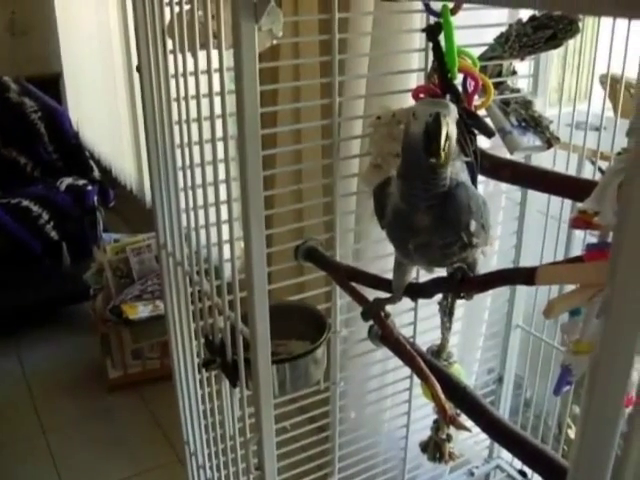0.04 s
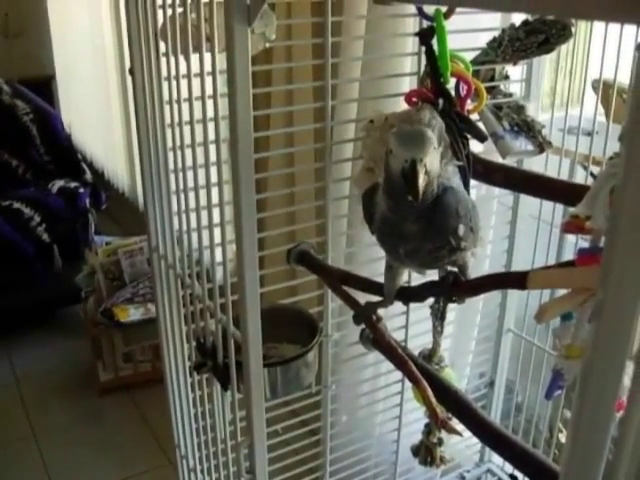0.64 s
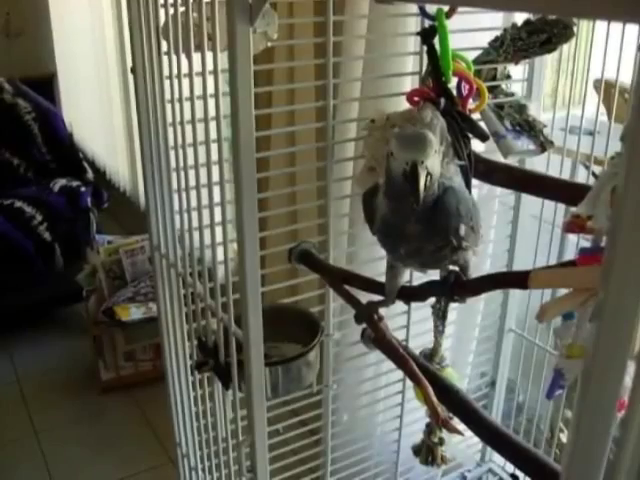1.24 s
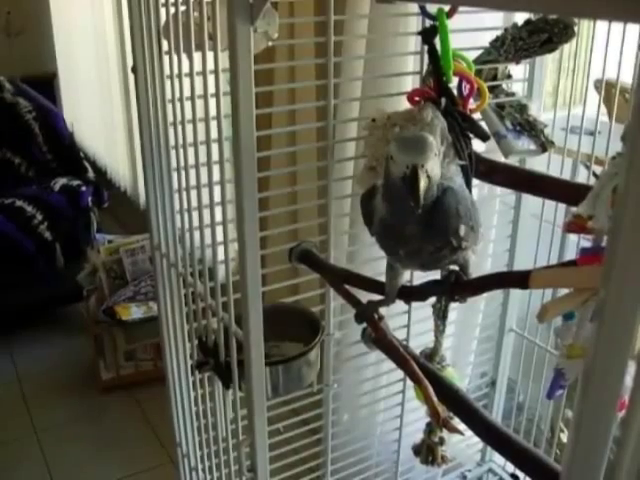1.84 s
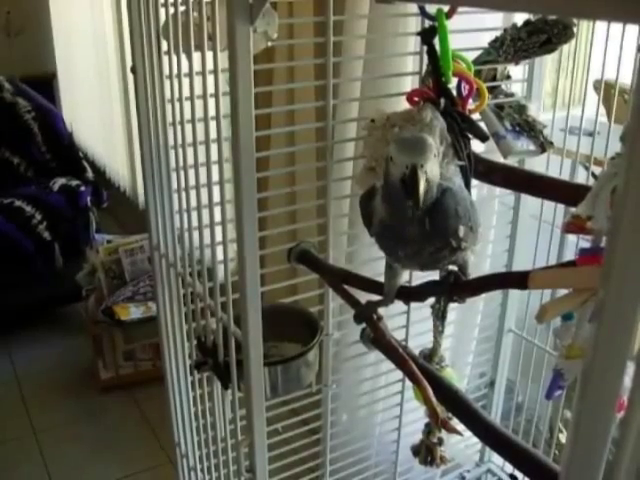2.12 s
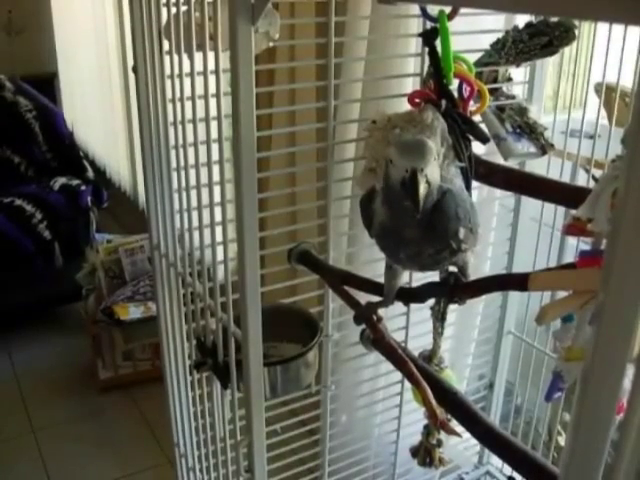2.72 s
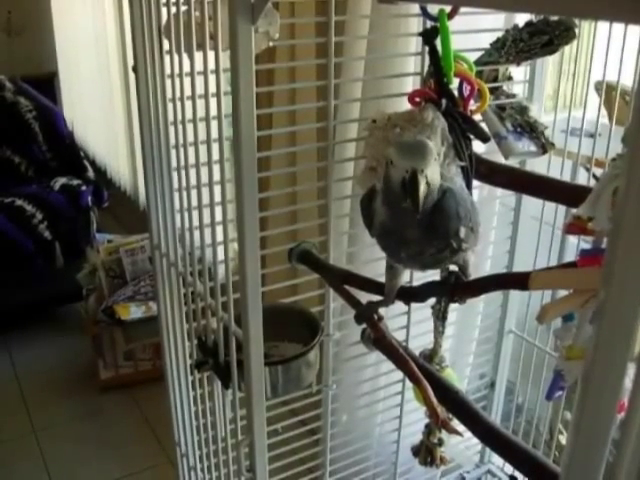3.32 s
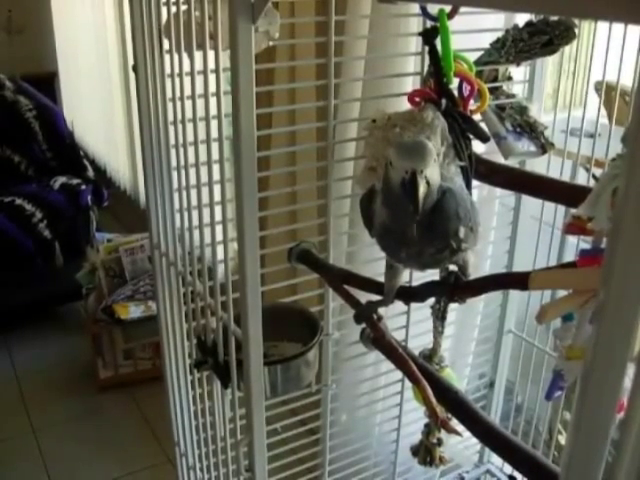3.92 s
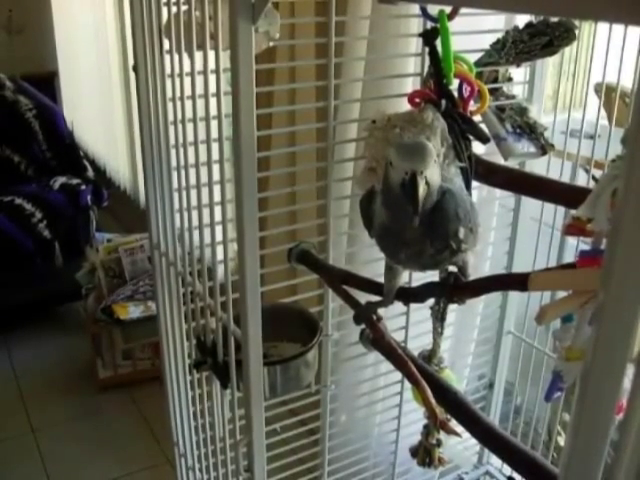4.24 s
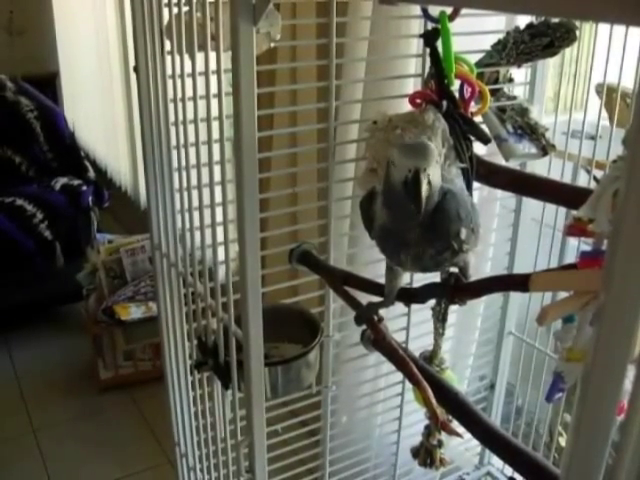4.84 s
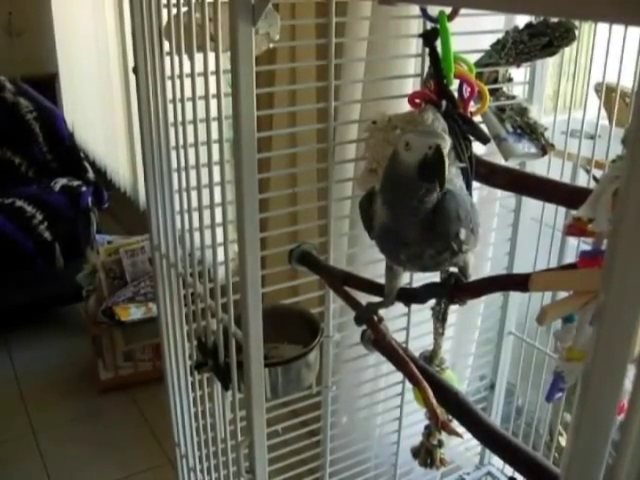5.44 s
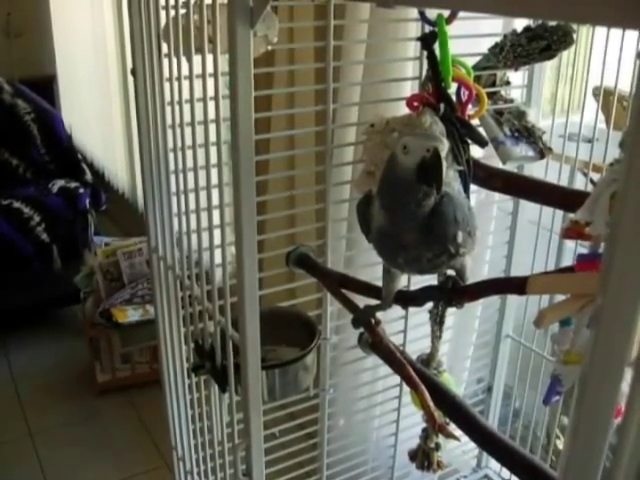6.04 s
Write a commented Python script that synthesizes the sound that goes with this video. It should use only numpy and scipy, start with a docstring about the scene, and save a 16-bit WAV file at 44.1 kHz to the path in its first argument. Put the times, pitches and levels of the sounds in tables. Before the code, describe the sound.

A low motor hum runs throughout in a quiet room, throbbing about three times a second over a soft rumble of air. Close to the microphone, a parrot clicks its beak at irregular moments, each click tiny and sharp with a brief room echo. Faint ticks come at about 0.1 and 1.2 seconds, then firmer snaps at 1.6 and 2 seconds with light ticks around them. The loudest snap lands at 2.6 seconds, followed by a small one at 2.8. More snaps come at 3.6 and 4.1 seconds. From 4.4 to 5 seconds, ticks and tiny grinds bunch together around another snap. One more snap sounds at 5.5 seconds and a last tick at 5.8. The sound is narrow, like a telephone, with light hiss and a very faint, thin whine.

```python
"""A grey parrot clicks its beak at odd moments, perched close to a small camera's microphone.
Each snap rings the horn of the beak and the hollow of the mouth; nearby surfaces and the quiet room
answer. Behind it, air rumbles and two motors of nearly equal speed hum, beating three times a second.
The narrow-band recorder adds hiss and a thin whine."""
import sys
import numpy as np
from scipy import signal
from scipy.fft import rfft, irfft
from scipy.io import wavfile

SR = 44100
rng = np.random.default_rng(int(sys.argv[2]) if len(sys.argv) > 2 else 0)


def master(y):
    """Save y as 16-bit WAV."""
    cut = np.clip(np.atleast_2d(y).T, -1, 1)
    pcm = np.round(cut * 32767)  # scale
    wavfile.write(sys.argv[1], SR, pcm.astype(np.int16))


N = 272538
TIME = np.arange(N) / SR

# low rumble of moving air: frequency_hz, density_db_per_hz
AIR_RUMBLE = [(5, -63.5), (15, -51.5), (30, -58.5), (80, -58), (128, -59), (155, -54), (200, -59),
              (235, -58.5), (258, -53.5), (273, -54.5), (293, -52.5), (330, -62.5), (500, -66),
              (1000, -90.5)]
# the room's faint rush: frequency_hz, density_db_per_hz
ROOM_RUSH = [(200, -92.5), (600, -68), (1000, -71), (1220, -72), (1450, -70.5), (2000, -75), (2500, -75),
             (2950, -76.5), (3550, -76.5), (3950, -79.5), (4400, -96)]
# hum of the main motor: multiple_of_speed, rms_db
MOTOR_HARMONICS = [(1, -22.5), (2, -45.5), (3, -43), (4, -42), (6, -54.5)]
# weaker wavering tones of the house: pitch_hz, rms_db
HOUSE_DRONES = [(17.3, -38), (22.9, -49), (75.7, -52), (120, -44), (258.5, -41.5), (290, -45),
                (310.3, -53.5)]
# echoes off surfaces near the cage, ahead of the room's colour: delay_s, gain_db
NEAR_ECHOES = [(.0031, -20.5), (.0046, -16), (.0072, -12), (.0099, -14.5), (0.016, -25.5), (0.018, -26.5)]
# how long the room rings: frequency_hz, t60_s
ROOM_RING_TIMES = [(1000, 0.48), (2400, 0.33), (3250, 0.43), (4200, 0.33)]
# the room's colour, on echoes and tail alike: frequency_hz, gain_db
ROOM_RESPONSE = [(1000, -6.5), (2100, -4), (2550, 4), (2920, -3.5), (3350, -2), (4200, -1.5)]
# light ticks and grinds of the beak, levels ahead of the bass cut and the mouth's notch:
# start_s, horn_db, horn_hz, horn_swell_s, mouth_db, mouth_hz, slip_count
BEAK_TICKS = [(0.143, -22, 3040, 0.00062, -41, 1770, 1), (1.197, -29.5, 3070, .001, -25.5, 1690, 1),
              (1.5642, -28, 3500, .0005, -37, 1700, 3), (1.571, -27, 3200, .0006, -28, 1700, 1),
              (1.8462, -26, 3230, 0.00058, -42, 1490, 1), (2.0172, -26, 3400, 0.0007, -38, 1700, 1),
              (2.0275, -33, 3550, 0.00075, -44, 1700, 2), (2.0922, -26, 3220, .0008, -30, 2500, 1),
              (2.2533, -31.5, 3230, .0006, -26, 1440, 2), (3.6704, -28, 2700, .0004, -23, 1480, 4),
              (4.075, -23, 3230, .0005, -30, 2300, 2), (4.3907, -28, 2310, .0006, -18, 1500, 1),
              (4.6191, -25, 2700, 0.0005, -17, 1660, 1), (4.6212, -32, 2650, 0.0005, -26, 1700, 4),
              (4.7994, -38, 2790, .0006, -22.5, 1390, 2), (4.8646, -25.5, 3430, .0008, -26, 2330, 1),
              (4.9232, -22.5, 3100, 0.00055, -24, 1910, 2), (4.9238, -23, 3100, 0.00052, -24, 2100, 7),
              (5.0077, -29, 3570, 0.00065, -30, 1510, 1), (5.0102, -27, 3570, 0.0008, -38, 1500, 1),
              (5.244, -29, 3590, .0006, -39, 1400, 2), (5.421, -27, 3650, 0.00078, -28, 1620, 1),
              (5.5207, -27, 3400, 0.00057, -32, 2100, 1), (5.8386, -21.5, 3800, 0.0009, -28, 1550, 1)]
# hard snaps of the beak, levels likewise: start_s, horn_db, horn_hz, horn_swell_s, mouth_db, mouth_hz,
# crack_db, rebound_delay_s, rebound_db, rebound_hz, rebound_swell_s
BEAK_SNAPS = [(1.5612, -30, 3360, 0.0019, -15.5, 1600, -13.5, 0.00056, -11, 1900, 0.00021),
              (2.0065, -12, 3250, 0.0018, -15.2, 1800, -12, .00132, -6.5, 3100, 0.00074),
              (2.6041, -3, 3160, 0.00093, -5, 1790, -22, .00209, -6.5, 3630, 0.00041),
              (2.8444, -22, 3040, 0.00036, -26, 2270, -24, .00136, -20.5, 3200, 0.00044),
              (3.5555, -27.5, 2930, 0.0015, -11.5, 1760, -23, 0.00084, -23, 1800, 0.00075),
              (4.0683, -7.5, 3070, 0.00049, -15, 1750, -28, 0.001424, -15, 3190, 0.00043),
              (4.7286, -13, 3370, .00072, -19, 2390, -21, .00124, -18, 2970, 0.00043),
              (5.5151, -16.5, 3280, 0.001, -13.5, 2200, -25, .00142, -14, 3680, 0.00035)]
# the recorder's hiss, ahead of its top cut: frequency_hz, density_db_per_hz
RECORDER_HISS = [(3000, -91.5), (4400, -82.5), (6000, -85), (7600, -85), (8000, -94)]


def gain_of(db):
    """Decibels to an amplitude factor."""
    return 10 ** (np.asarray(db) / 20)


def curve_at(points, hz):
    """Reads (frequency_hz, value) points joined by straight lines on a log-frequency axis."""
    point_hz, values = np.transpose(points)
    return np.interp(np.log(hz + 1), np.log(point_hz + 1), values)


def add(mix, start_s, sound):
    """Mixes a sound in at start_s."""
    part = mix[round(start_s * SR):][:len(sound)]
    part += sound[:len(part)]


def equalise(sound, curve):
    """Colours a sound by a curve of (frequency_hz, gain_db)."""
    gains = gain_of(curve_at(curve, np.fft.rfftfreq(N, 1 / SR)))
    return irfft(rfft(sound) * gains, N)


def low_pass(sound, cutoff_hz, taps):
    """A steep low-pass; more taps make it steeper."""
    kernel = signal.firwin(taps, cutoff_hz, window=("kaiser", 8), fs=SR)
    return signal.oaconvolve(sound, kernel, "same")


def noise(spectrum):
    """Steady noise with the given power per Hz."""
    return equalise(rng.standard_normal(N), spectrum) * np.sqrt(SR / 2)


def drift(fastest_hz):
    """A slow random wander, about 1 rms."""
    rates_hz = np.geomspace(fastest_hz / 10, fastest_hz, 20)[:, None]
    coarse_s = TIME[::256]
    waves = np.sin(2 * np.pi * (rates_hz * coarse_s + rng.random(rates_hz.shape)))
    return np.interp(TIME, coarse_s, waves.sum(0) / np.sqrt(10))


def tone(rms_db, turns):
    """A pure tone, its phase given in turns."""
    return gain_of(rms_db) * np.sqrt(2) * np.cos(2 * np.pi * turns)


def room_air():
    """Room tone: moving air rumbles under a faint rush."""
    return noise(AIR_RUMBLE) + noise(ROOM_RUSH)


def house_drones(waver_turns=0.22):
    """Weak tones of the house, each wavering on its own."""
    return sum(tone(db, hz * TIME + rng.random() + waver_turns * drift(fastest_hz=2.2))
               for hz, db in HOUSE_DRONES)


def motor_hum(main_hz=58.44, second_hz=55.494, second_db=-34, in_step_s=0.28, slip_turns=0.0018):
    """Two motors in the background slide in and out of step, so the hum throbs."""
    since_s = TIME - in_step_s
    turns = main_hz * since_s + slip_turns * drift(fastest_hz=0.84)
    hum = tone(second_db, second_hz * since_s)
    for multiple, rms_db in MOTOR_HARMONICS:
        phase_turns = (multiple > 1) * rng.random()  # only the overtones start at random
        hum += tone(rms_db, multiple * turns + phase_turns)
    return hum


def room_tail(gain_db=-7.5, build_up_s=0.0012, reflections_per_s=4000):
    """Dense reflections merge into a tail in which each band dies at its own speed."""
    t = np.arange(SR // 2) / SR
    reflections = rng.choice([-1., 1.], len(t)) * (rng.random(len(t)) < reflections_per_s / SR)
    hz, age_s, bands = signal.stft(reflections, SR, nperseg=256)
    decay = gain_of(-60 * age_s / curve_at(ROOM_RING_TIMES, hz[:, None]))
    tail = signal.istft(bands * decay, SR)[1][:len(t)]
    tail *= 1 - np.exp(-t / build_up_s)
    return gain_of(gain_db) * tail / np.linalg.norm(tail)


def room_answer(direct, tail_crossfade_s=3.3):
    """Near echoes, then two room tails that slowly crossfade, so each click's reverb differs a little."""
    fade_angle = 2 * np.pi * TIME / tail_crossfade_s
    reflected = sum(signal.fftconvolve(direct * share, room_tail())[:N]
                    for share in (np.cos(fade_angle), np.sin(fade_angle)))
    for delay_s, gain_db in NEAR_ECHOES:
        add(reflected, delay_s, gain_of(gain_db) * direct)
    return equalise(reflected, ROOM_RESPONSE)


def ring(level_db, pitch_hz, swell_s):
    """A heavily damped resonance: it peaks at swell_s and dies within milliseconds."""
    t = np.arange(SR // 80) / SR
    age = t / swell_s
    envelope = age ** 2 * np.exp(2 - 2 * age)
    return gain_of(level_db) * envelope * np.sin(2 * np.pi * pitch_hz * t)


def beak_contact(horn_db, horn_hz, horn_swell_s, mouth_db, mouth_hz, crack_db):
    """One slip of the beak's edge gives a brief crack and rings horn and mouth together."""
    crack = ring(crack_db, pitch_hz=3720, swell_s=0.00046)
    horn = ring(horn_db, horn_hz, horn_swell_s)
    mouth = ring(mouth_db, mouth_hz, swell_s=0.00053)  # the soft mouth damps its ring quickly
    return crack + horn + mouth


def beak_ticks(gap_s=0.0015, scatter_gaps=0.31, detune=0.26, fade_db_per_slip=-1):
    """The beak ticks over a ridge, or grinds: it catches again and again, weaker and retuned each time."""
    ticks = np.zeros(N)
    for start_s, horn_db, horn_hz, swell_s, mouth_db, mouth_hz, slip_count in BEAK_TICKS:
        for k in range(round(slip_count)):
            late, horn_shift, mouth_shift = rng.uniform(-1.1, 1, 3) * (k > 0)  # later slips stray
            slip = beak_contact(horn_db, horn_hz * (1 + detune * horn_shift), swell_s,
                                mouth_db, mouth_hz * (1 + detune * mouth_shift), crack_db=horn_db - 9)
            slip_s = start_s + gap_s * (k + scatter_gaps * late)
            add(ticks, slip_s, gain_of(fade_db_per_slip * k) * slip)
    return ticks


def beak_snaps():
    """The lower beak snaps off a ridge of the upper one; the halves meet again at once in a rebound."""
    snaps = np.zeros(N)
    for start_s, *contact, delay_s, rebound_db, rebound_hz, rebound_swell_s in BEAK_SNAPS:
        snap = beak_contact(*contact)
        add(snap, delay_s, ring(rebound_db, rebound_hz, rebound_swell_s))
        add(snaps, start_s, snap)
    return snaps


def mouth_hollow(clicks, notch_hz=2575, width_hz=110, depth_db=-12):
    """The cavity behind the tongue swallows one narrow band between the mouth's ring and the horn's."""
    notched = signal.lfilter(*signal.iirnotch(notch_hz, notch_hz / width_hz, fs=SR), clicks)
    return notched + gain_of(depth_db) * (clicks - notched)


def parrot(bass_cut_hz=950):
    """Snaps and ticks straight from the perch; so small a source radiates no bass."""
    bass_cut = signal.butter(2, bass_cut_hz, "high", fs=SR, output="sos")
    return mouth_hollow(signal.sosfilt(bass_cut, beak_snaps() + beak_ticks()))


def scene():
    """At the microphone, in mono: the parrot up close, with the room, hum and air behind it."""
    clicks = parrot()
    return (clicks + room_answer(clicks) + motor_hum() + house_drones() + room_air())[None]


def record(dry, ceiling=0.72, band_hz=4225, hum_top_hz=85, clock_hz=8000, clock_db=-53, top_cut_hz=8060):
    """The camera overloads on the hardest snap, narrows it all to a telephone band, adds hiss and whine."""
    overloaded = np.clip(dry[0], -ceiling, ceiling)
    narrow = low_pass(overloaded, band_hz, taps=161)
    hum_polarity = np.sign(low_pass(narrow, hum_top_hz, taps=3001))
    clock = gain_of(clock_db) * np.cos(2 * np.pi * clock_hz * TIME)
    whine = hum_polarity * clock  # the faint clock tone flips with the hum
    return low_pass(narrow + whine + noise(RECORDER_HISS), top_cut_hz, taps=701)[None]


dry = scene()
out = record(dry)
master(out)
```